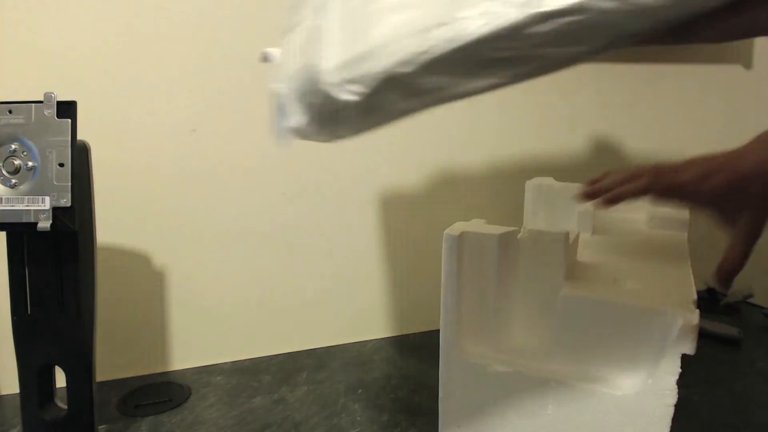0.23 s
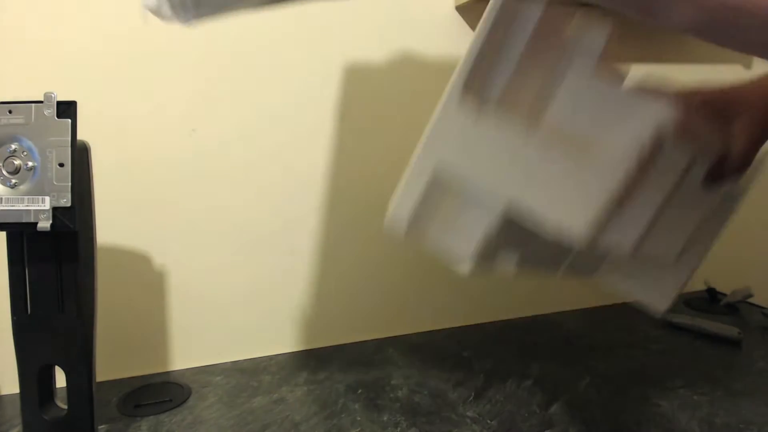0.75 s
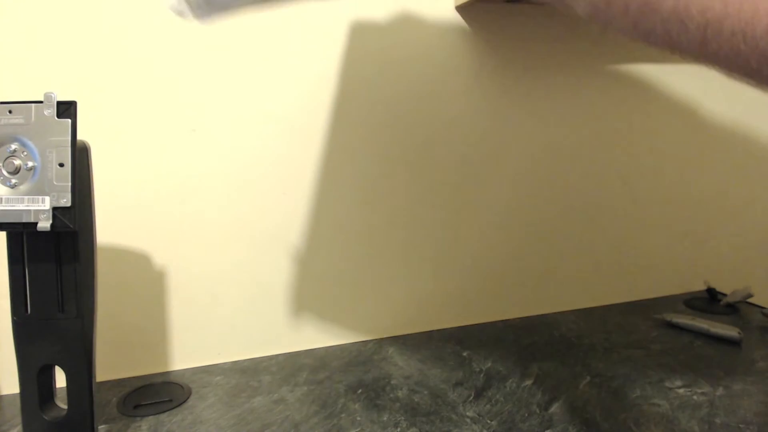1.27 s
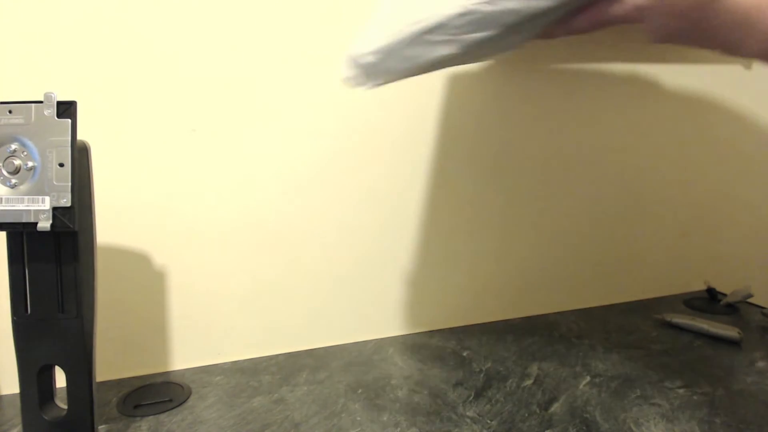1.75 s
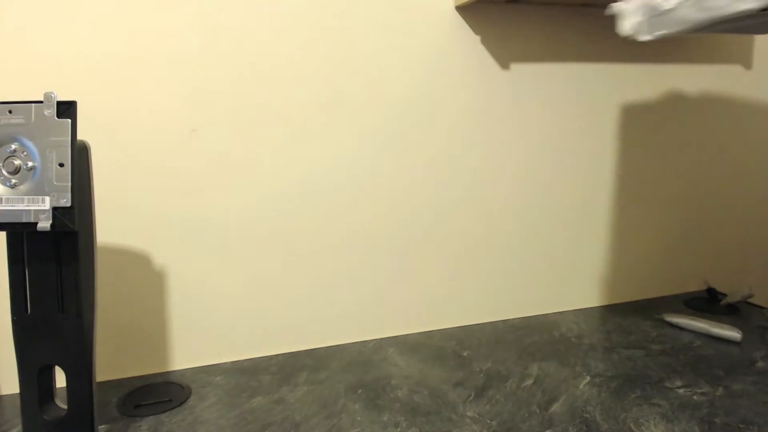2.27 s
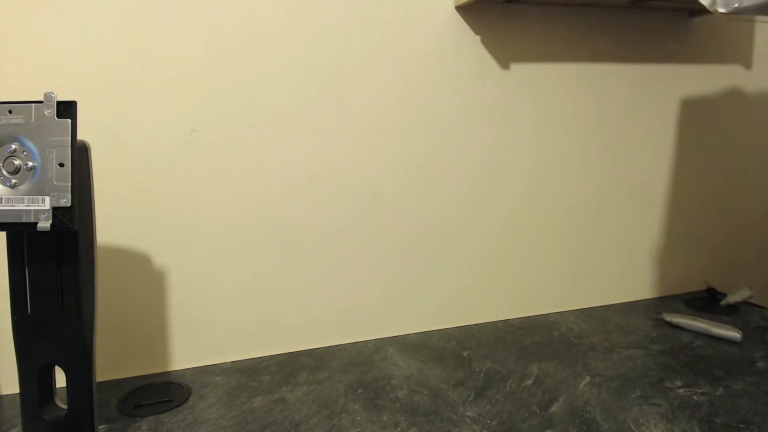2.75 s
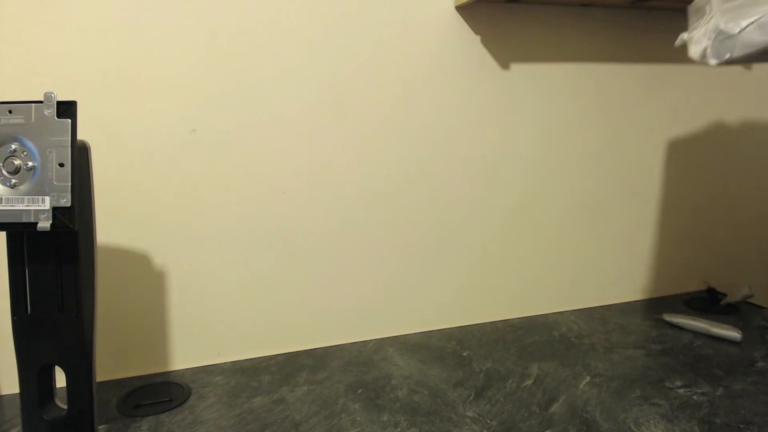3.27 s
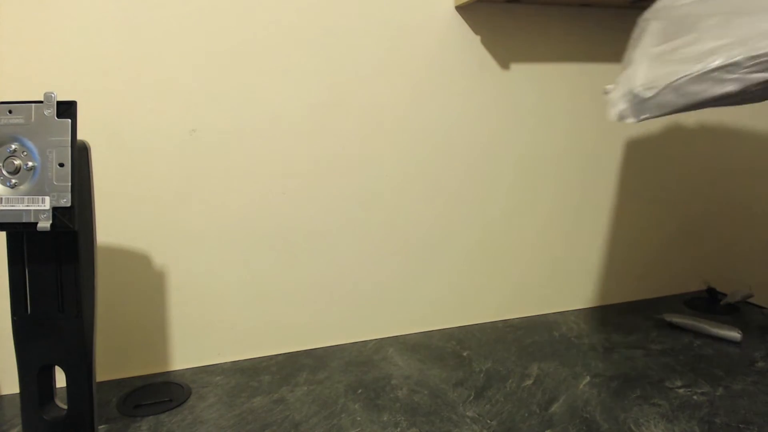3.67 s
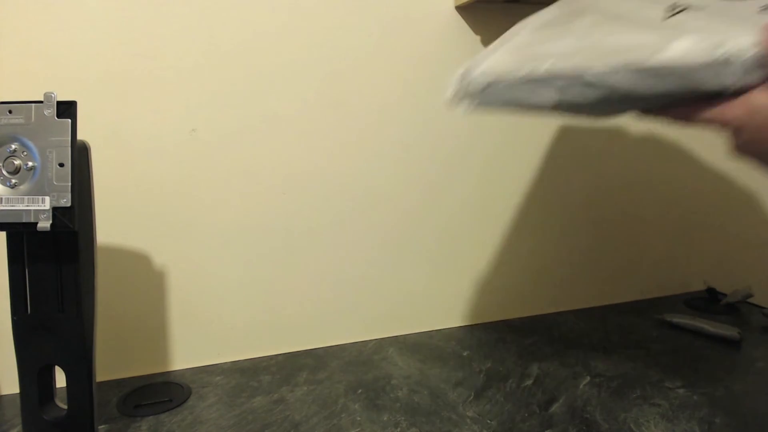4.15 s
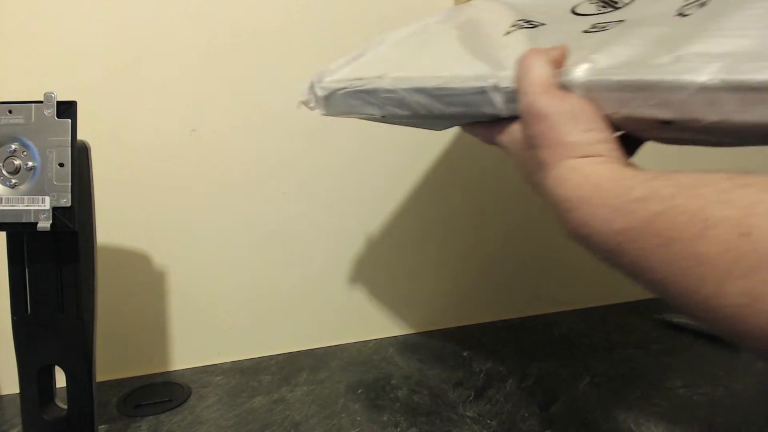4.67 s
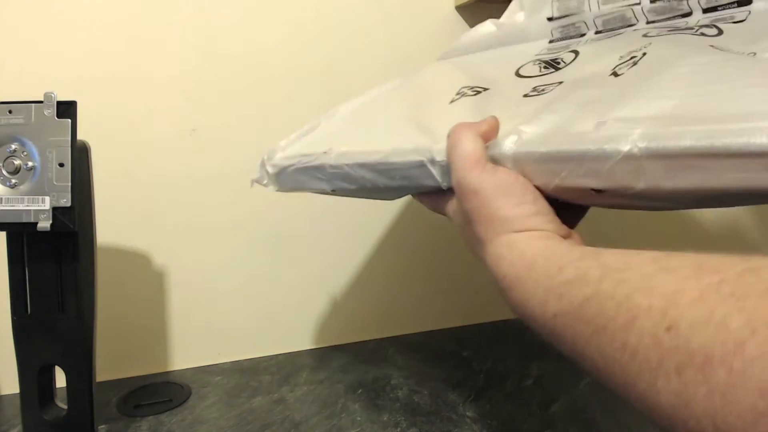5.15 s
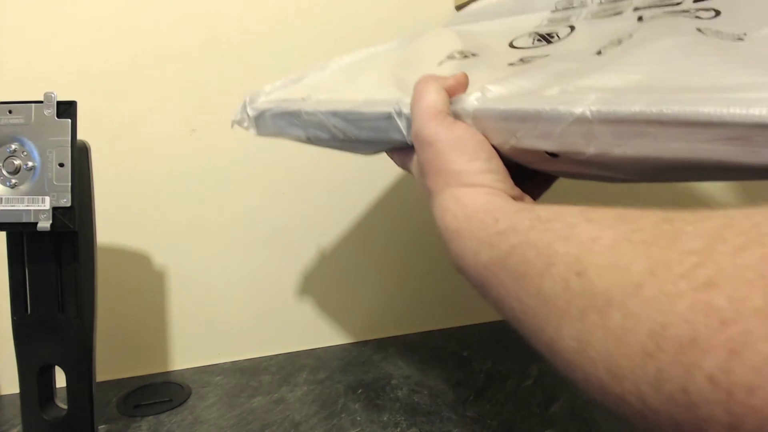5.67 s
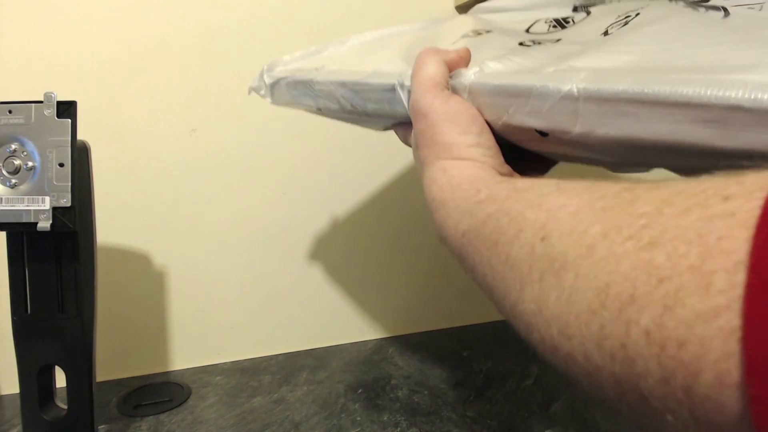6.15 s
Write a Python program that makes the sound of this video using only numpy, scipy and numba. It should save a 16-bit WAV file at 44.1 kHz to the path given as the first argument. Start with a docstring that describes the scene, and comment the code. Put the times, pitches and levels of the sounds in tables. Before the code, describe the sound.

Hands pull moulded foam packing from a cardboard box, close to a mono microphone in a small quiet room. Brief scrapes and a dull knock lead to brisk, bright rubbing strokes, then hollow thumps, the strongest nearly three seconds in. After a near-silent lull, a thin foam sleeve rustles more softly and crinkles, with small snaps and a few low box bumps toward the end.

```python
"""Foam packing pushed into a cardboard box

Hands slide moulded foam blocks and a foam sleeve over each other and into a box, heard close up in mono.
Swarms of tiny bead slips hiss through foam resonances, and a moving resonance makes the foam sheet ring.
Creases snap as short bursts of filtered noise; bumps ring the hollow box as a set of fading tones.
Squeezes shake the hollow block and the box walls; a small room adds echoes and a steady hush."""
import sys
import numpy as np
from scipy import signal
from scipy.fft import rfft, irfft
from scipy.io import wavfile
from scipy.ndimage import uniform_filter1d
from numba import njit

SR = 44100
rng = np.random.default_rng(int(sys.argv[2]) if len(sys.argv) > 2 else 0)


def pcm_store(signal):
    """Save signal as 16-bit PCM."""
    levels = np.round(np.clip(np.atleast_2d(signal), -1, 1) * 32767)
    wavfile.write(sys.argv[1], SR, levels.astype(np.int16).T)


N = 283122  # samples, about 6.4 s

# All levels in the tables are relative: the functions below set the final balance.
# Creases that snap: start_s, level_db, centre_hz, t60_s (time to fade by 60 dB), side_bands_db (re centre)
CREASE_SNAPS = [(0.2038, -44.5, 2080, 0.19, -17), (0.3909, -30.5, 2190, 0.12, -21),
                (0.5032, -35.5, 2400, 0.48, 10), (0.7326, -44, 10400, 0.071, -6),
                (1.1297, -27.5, 1470, 0.25, 1), (1.667, -20.5, 2280, 0.073, -27),
                (1.9798, -40, 7100, 0.14, -20), (2.1549, -34.5, 1500, 0.39, -20),
                (2.7451, -25.5, 8600, 0.31, 12.5), (3.0848, -31, 1560, 0.1, -3),
                (3.6271, -48, 9500, 0.09, 1), (3.715, -33, 2130, 0.079, -14), (3.7882, -32.5, 2350, 0.1, 4),
                (3.852, -36.5, 2470, 0.18, 8), (3.89, -33.5, 2280, 0.39, 10), (3.9894, -31, 2390, 0.19, -2),
                (4.1459, -33.5, 1890, 0.19, 7.5), (4.4994, -31, 2070, 0.091, -21),
                (4.765, -33.5, 2030, 0.22, -10), (4.8213, -26, 5640, 0.079, -18),
                (4.8544, -45, 2260, 0.12, -10), (4.9281, -25, 3280, 0.11, -7.5),
                (5.0803, -28, 1620, 0.16, -26), (5.1177, -29, 2180, 0.077, 2),
                (5.3272, -35, 1690, 0.16, -19), (5.5716, -34.5, 1777, 0.22, -7),
                (5.7363, -29, 1960, 0.11, -22), (5.7921, -26, 1910, 0.097, -27),
                (5.8711, -35, 1420, 0.45, -19), (5.9463, -26.5, 2000, 0.12, -36),
                (6.0451, -25.5, 2650, 0.22, -1.5)]
# Bumps on the box: start_s, level_db, upper_modes_db (re lowest), favoured_hz (upper mode rung most),
# held_s (seconds before the boom fades faster)
BOX_BUMPS = [(0., -35.5, -40, 197.5, 0.049), (0.394, -30, -4, 280, 0.085), (0.477, -13.5, -27, 268, 0.045),
             (1.131, -43, -3, 530, 0.12), (1.665, -18.5, 9, 233, 0.064), (2.157, -37, -16, 453, 0.1),
             (2.178, -11, -23.5, 350, 0.06), (2.566, -32, 4, 468, 0.077), (2.665, -35, 1, 380, 0.1),
             (2.787, -3.5, -23, 254, 0.077), (5.088, -26.5, -4, 452, 0.094),
             (5.177, -15.5, -17.5, 216, 0.064), (5.391, -18, -2, 234, 0.081), (5.42, -18, -34, 234, 0.037),
             (5.866, -31, 3, 568, 0.1), (6.027, -18.5, -12, 199, 0.093)]
# Ringing modes of the hollow box: pitch_hz, level_db, t60_s (when bumped; rubbed walls fade sooner)
BOX_MODES = [(87.3, -19, 0.09), (139.4, -6.5, 0.84), (202.3, 0, 0.135), (216, 10.5, 0.14), (255.8, 7, 0.23),
             (335.2, 4.5, 0.64), (386, 11, 0.18), (510, -9, 0.22), (590, -28, .15)]
# Hiss colour of the foam beads: pitch_hz, level_db
BEAD_COLOUR = [(2800, -2.5), (3300, 0.5), (4500, 0.5), (6200, -1), (7000, -8)]
# Hiss colour of the finest beads: pitch_hz, level_db
FINE_COLOUR = [(7000, -3.5), (7900, -2.5), (9500, -5.5), (11500, -7.5), (13500, -18.5), (15500, -25)]
# Colour of the foam sleeve: pitch_hz, level_db
SLEEVE_COLOUR = [(1100, 5), (1500, 5), (2100, 2.5), (2800, 1)]
# Colour of the hollow inside the block: pitch_hz, level_db
HOLLOW_COLOUR = [(330, 0), (500, -7.5), (800, 4), (1100, -11.5)]
# Spectrum shape of the room hush: pitch_hz, level_db (per Hz)
AIR_SPECTRUM = [(24, -52.5), (40, -58), (139, 0), (333, -1), (377, 6), (817, -5), (1020, -12.5),
                (2920, -11), (5720, -19.5), (14000, -29), (15500, -58)]
# Strokes of foam over foam: start_s, rise_s, hold_s, bead_hiss_db, fine_beads_db (re hiss),
# sheet_ring_db (re hiss)
FOAM_STROKES = [(0.384, 0.016, 0.055, -49.5, 2.5, 0), (0.487, 0.039, 0.046, -47.5, 0.5, 2.5),
                (0.604, 0.037, 0.032, -49.5, -0.5, -4), (1.116, 0.015, 0.0035, -34.5, -1, -9),
                (1.228, 0.027, .025, -33.5, 0.5, -5.5), (1.358, 0.054, 0.0071, -36.5, 0, -2.5),
                (1.484, 0.04, 0.01, -42.5, 1, -2.5), (1.55, 0.024, 0.0074, -50, 0, 1),
                (1.659, 0.012, 0.028, -38, -4, 6.5), (1.693, 0.036, 0.012, -44.5, 9, 2),
                (1.96, 0.026, 0.12, -66.5, -7, 4.5), (2.152, .01, 0.069, -48.5, -13.5, -26),
                (2.309, 0.042, 0.044, -37, -3.5, -1), (2.531, 0.046, 0.071, -49.5, 2, 4),
                (2.617, 0.037, 0.065, -52.5, 3, 8.5), (2.723, 0.04, 0.015, -34, -0.5, -12),
                (2.768, 0.039, 0.13, -47.5, -0.5, -0.5), (2.989, 0.041, .01, -60, 2, 7.5),
                (3.052, 0.03, .005, -51.5, -20, 1), (3.67, 0.15, 0.016, -59.5, -1.5, 0),
                (3.832, 0.056, 0.046, -49.5, 0, -4), (3.897, 0.077, 0.053, -39.5, 0.5, -5.5),
                (4.093, 0.067, 0.05, -53, 1.5, -7), (4.193, 0.053, 0.066, -54.5, 0.5, -2),
                (4.419, 0.041, 0.022, -44, -3.5, -6), (4.563, 0.072, 0.021, -54, -1.5, -6),
                (4.681, 0.023, 0.0057, -57, -12, 1), (4.755, 0.028, .04, -51.5, -14, -7),
                (4.816, 0.035, .005, -44, -8, -6.5), (4.877, .05, 0.056, -57, 0, 9),
                (4.961, 0.051, .005, -46, -2.5, -13), (5.084, 0.031, 0.018, -46, -11, -1),
                (5.122, 0.042, 0.051, -39.5, 2, 1), (5.311, 0.017, 0.018, -57, -2, 5),
                (5.343, 0.042, 0.026, -34, -3, 1.5), (5.41, 0.04, 0.032, -43.5, -3.5, -5),
                (5.548, 0.12, .01, -54, -7.5, 7.5), (5.699, 0.052, 0.0035, -48.5, -11, 0),
                (5.782, 0.023, 0.064, -61.5, -17, 5), (5.882, 0.056, 0.09, -60, -27, 2.5),
                (6.018, 0.028, 0.0039, -44, 0.5, 2), (6.065, 0.043, 0.098, -63.5, -13, 8),
                (6.35, 0.11, .01, -55, -5, -9)]
# Squeezes of the hollow bodies: start_s, rise_s, hold_s, block_hollow_db, resonance_hz,
# box_walls_db (re hollow)
HOLLOW_SQUEEZES = [(0.202, 0.0046, 0.0062, -45.5, 784, -22), (0.377, 0.023, .005, -36.5, 388, 0.5),
                   (0.455, 0.05, 0.0041, -51, 358, 23.5), (0.526, 0.027, .005, -46, 616, -1),
                   (0.64, 0.049, .01, -44.5, 750, -19), (.73, .03, 0.027, -66, 806, -13),
                   (0.89, 0.028, 0.024, -61, 480, -11), (1.117, 0.025, 0.0073, -31.5, 460, -10),
                   (1.231, 0.018, 0.036, -35.5, 426, -25), (1.383, 0.026, 0.019, -39.5, 573, -25),
                   (1.661, 0.019, 0.061, -34.5, 602, -8), (2.002, 0.11, .005, -48.5, 590, -19),
                   (2.153, 0.018, 0.0075, -33, 414, -2.5), (2.18, 0.031, 0.13, -40, 440, -4),
                   (2.367, 0.049, 0.014, -36.5, 447, -25), (2.572, 0.007, 0.0096, -33.5, 462, -59),
                   (2.645, 0.036, 0.0058, -37.5, 440, -15), (2.714, 0.08, 0.0069, -32, 366, 7.5),
                   (2.789, 0.058, 0.028, -44, 385, 3.5), (2.96, 0.052, 0.071, -56, 383, -11),
                   (3.704, 0.0095, 0.014, -52, 690, -8), (3.819, 0.077, .03, -46.5, 430, -12),
                   (3.96, 0.065, 0.0072, -40.5, 544, -16), (4.12, 0.064, .005, -53, 880, -6),
                   (4.228, 0.047, .03, -59, 750, 5), (4.434, .03, .02, -55.5, 443, 8.5),
                   (4.477, 0.015, 0.0046, -46, 504, -10), (4.68, 0.027, 0.0079, -72, 595, 9),
                   (4.943, 0.018, 0.0069, -48, 770, -3), (5.074, 0.015, 0.077, -42, 410, -0.5),
                   (5.152, 0.074, .005, -41.5, 463, 6.5), (5.296, 0.091, 0.021, -40, 507, 6.5),
                   (5.422, 0.04, 0.0045, -37.5, 385, -8), (5.552, 0.027, 0.0057, -59, 600, -5),
                   (5.614, 0.047, 0.0057, -46.5, 470, -3), (5.713, 0.042, 0.076, -61, 537, 0),
                   (5.864, 0.0071, 0.009, -43.5, 610, -19), (5.905, 0.0093, 0.023, -44.5, 560, -19),
                   (6.016, 0.047, 0.012, -55.5, 497, 13), (6.316, .02, 0.027, -68, 513, -7)]
# Faint rustle of the held packing between strokes: time_s, bead_hiss_db, fine_beads_db,
# block_hollow_db, box_walls_db
HELD_RUSTLE = [(0., -61, -66, -60.5, -58.5), (.15, -69.5, -81, -88, -63.5), (.36, -73.5, -85, -89, -63),
               (.75, -66, -78, -69, -64), (.93, -63.5, -73.5, -63.5, -66), (1.1, -61.5, -66, -62, -65),
               (1.63, -72, -98, -54, -58), (1.85, -63.5, -70, -62.5, -61.5), (2.5, -64, -87, -66, -56.5),
               (3.15, -68, -75, -62.5, -67), (3.3, -73, -82, -72, -69), (3.62, -79, -86, -97, -73),
               (3.9, -59, -69, -73, -56.5), (4.4, -58.5, -62.5, -68.5, -62), (4.8, -59.5, -65.5, -62, -54),
               (5.55, -59.5, -70, -60, -59), (6.1, -60.5, -63, -59, -53.5),
               (6.42, -63, -69.5, -64.5, -59.5)]

AIR_DB = -66.5
ROOM_T60_S, ROOM_DB = 0.19, -12.5
TOP_HZ = 15700
SLEEVE_HZ, TAUT_S = 2050, (3.7, 5.07)  # the sleeve rings here while it is pulled taut (from, to)
RISE_POWER = 1.86  # strength grows as this power of time
STROKE_FALL_DB_PER_S, SQUEEZE_FALL_DB_PER_S = 324.5, 348
# sheet ring at -45 dB hiss; it climbs as the stroke presses harder
SHEET_HZ, SHEET_HZ_PER_DB, SHEET_WANDER_HZ = 1980, 7.5, 150
STEP = 44  # samples between points of a gesture's gain curve
WALL_FUNDAMENTAL_DB, CRINKLE_TILT_DB_PER_OCTAVE = 1.5, -2
RUSTLE_SHEET_DB, RUSTLE_HZ = -0.5, 540
# the soft sleeve has a duller top than the blocks
SLEEVE_FROM_S, TOP_BAND_HZ, BLOCK_TOP_DB, SLEEVE_TOP_DB = 2.97, 13500, 5, -3.5


def undb(db):
    """Turn decibels into a gain."""
    return 10 ** (np.asarray(db) / 20)


def unit(x):
    """Scale a signal to an average (RMS) strength of 1."""
    return x / np.sqrt(np.mean(x ** 2))


def band(x, hz, width, order=1):
    """Keep a band of pitches of this width (Hz) around a centre."""
    edges = np.clip([hz - width / 2, hz + width / 2], 20, SR / 2.2)
    return signal.sosfilt(signal.butter(order, edges, "bandpass", fs=SR, output="sos"), x)


@njit
def moving_band(x, hz, sharp):
    """Band-pass whose centre moves; width = centre / sharp."""
    y, b, l = np.empty(len(x)), 0., 0.  # b and l: the filter's band and low memories
    for i in range(len(x)):
        g = np.tan(np.pi * hz[i] / SR)
        v = (b + g * (x[i] - l)) / (1 + g * (g + 1 / sharp))
        b, l, y[i] = 2 * v - b, l + 2 * g * v, v
    return y


def ring(x, hz, t60):
    """One mode: a tone that x sets ringing and that then dies away."""
    pole = np.exp(2j * np.pi * hz / SR - np.log(1000) / (t60 * SR))
    return signal.lfilter([1], [1, -pole], x).imag


def walk(rate):
    """Random levels 1 / rate s apart, joined smoothly."""
    gap = int(SR / rate)
    levels = rng.standard_normal(N // gap + 2)
    steps = np.interp(np.arange(N) / gap, np.arange(N // gap + 2), levels)
    return 1.2 * uniform_filter1d(steps, gap // 2)


def slips(scatter_db):
    """A swarm of tiny slips: most are faint, a few stand out."""
    boost_db = scatter_db * np.minimum(rng.exponential(size=N), 5.)
    return rng.standard_normal(N) * undb(boost_db)


def resonant(hz, sharp):
    """Slips through one strong resonance that shifts with the grip."""
    once = moving_band(slips(3.3), hz, sharp)
    return unit(moving_band(once, hz, sharp))


def rub(colour, patchy_db, scatter_db=3.0, count=8):
    """Slips ring a row of foam resonances, each coming and going as the contact patch wanders."""
    hz, db = np.transpose(colour)
    width = (hz[-1] - hz[0]) / count
    out = 0
    swarms = slips(scatter_db), slips(scatter_db)
    for k, f in enumerate(np.linspace(hz[0], hz[-1], count)):
        level_db = np.interp(np.log(f), np.log(hz), db) + patchy_db * walk(22)
        out = out + undb(level_db) * band(swarms[k % 2], f, width, order=2)
    return unit(out)


def curves(rows):
    """Join each column's points by straight lines over time."""
    s, *columns = np.transpose(rows)
    return [np.interp(np.arange(N) / SR, s, c) for c in columns]


def gestures(rows, fall_db_per_s):
    """One gain row per gesture: a rise, a hold, then a steady fall in dB."""
    t = np.arange(0, N + STEP, STEP) / SR
    start, rise, hold, db = (c[:, None] for c in np.transpose(rows)[:4])
    up = np.clip((t - start) / np.maximum(rise, .002), 0, 1) ** RISE_POWER
    falling_s = np.maximum(t - start - rise - np.maximum(hold, 0), 0)
    return up * undb(db - fall_db_per_s * falling_s)


def joined(gains, weights):
    """Weighted sum of the gesture rows, at full rate."""
    total = np.asarray(weights) @ gains
    return np.interp(np.arange(N) / STEP, np.arange(len(total)), total)


def bumps():
    """A soft push and a short rattle ring the box modes until the boom is faded out quickly."""
    out, t = np.zeros(N + SR), np.arange(SR // 2) / SR
    push = np.sin(np.pi * np.clip(t / 0.00069, 0, 1)) ** 2
    for s, db, upper_db, best_hz, held_s in BOX_BUMPS:
        rattle = 0.63 * rng.standard_normal(len(t)) * np.exp(-t / 0.013)
        drive = push + rattle
        place_db = 1.03 * rng.standard_normal(len(BOX_MODES))  # every spot couples to the modes differently
        boom = 0
        for (hz, mode_db, t60), spot_db in zip(BOX_MODES, place_db):
            # upper modes lose 10.2 dB for each octave away from the favoured pitch
            favour_db = (upper_db + 5.0 - 10.2 * abs(np.log2(hz / best_hz))) * (hz > 160)
            boom = boom + undb(mode_db + spot_db + favour_db) * ring(drive, hz, t60)
        boom *= np.exp(-np.maximum(t - held_s, 0) / .027)  # the boom fades quickly after held_s
        out[int(s * SR):][:len(t)] += undb(db - 14.5) * boom / np.max(np.abs(boom))
    return out[:N]


def crinkles():
    """Lone ticks of film and beads, each ringing briefly in one of many narrow foam resonances."""
    out = 0
    for hz in np.geomspace(1300, 9000, num=18):
        strength = undb(0.93 * np.minimum(rng.exponential(size=N), 3.))
        ticks = (rng.random(N) < 16 / SR) * strength  # about 16 a second
        puff = signal.lfilter([1], [1, -np.exp(-1 / (.008 * SR))], ticks)  # each fades over 8 ms
        tick = unit(band(puff * rng.standard_normal(N), hz, 120 + .06 * hz, order=2))
        out = out + undb(CRINKLE_TILT_DB_PER_OCTAVE * np.log2(hz / 1300)) * tick
    return unit(out)


def sliding():
    """Beads hiss and the sheet rings as the hand moves; the surfaces catch and let go."""
    gains = gestures(FOAM_STROKES, STROKE_FALL_DB_PER_S)
    rustle, rustle_fine = undb(curves(HELD_RUSTLE)[:2])
    fine_db, sheet_db = np.transpose(FOAM_STROKES)[4:]
    hiss = joined(gains, np.ones(len(gains))) + rustle
    fine = joined(gains, undb(fine_db)) + rustle_fine
    sheet = joined(gains, undb(sheet_db)) + undb(RUSTLE_SHEET_DB) * rustle
    pressing_db = 20 * np.log10(hiss) + 45
    sheet_hz = SHEET_HZ + SHEET_HZ_PER_DB * pressing_db + SHEET_WANDER_HZ * walk(12)
    t = np.arange(N) / SR
    taut = (t > TAUT_S[0]) * (t < TAUT_S[1]) * undb(1.9 * walk(16))
    sleeve = unit(band(slips(3.), SLEEVE_HZ, 260, order=2))
    ring_sheet = 0.5 * resonant(sheet_hz, 2.6) + 0.9 * rub(SLEEVE_COLOUR, 2.2, count=5)
    ring_sheet = ring_sheet + .8 * taut * sleeve
    beads = rub(BEAD_COLOUR, 1.93, count=8) + undb(-1.5) * crinkles()
    grit = rub(FINE_COLOUR, 2.4, count=10)
    catching = undb(1.43 * walk(45))
    return catching * (hiss * beads + fine * grit + sheet * ring_sheet)


def bodies():
    """Rubbing shakes the hollow of the block and the walls of the box."""
    gains = gestures(HOLLOW_SQUEEZES, SQUEEZE_FALL_DB_PER_S)
    rustle, rustle_walls = undb(curves(HELD_RUSTLE)[2:])
    squeeze_hz, walls_db = np.transpose(HOLLOW_SQUEEZES)[4:]
    hollow = joined(gains, np.ones(len(gains))) + rustle
    # a weighted average, so the strongest squeeze counts most
    hollow_hz = (joined(gains, squeeze_hz) + RUSTLE_HZ * rustle) / hollow
    block = 0.61 * resonant(hollow_hz, 2.62) + 0.47 * rub(HOLLOW_COLOUR, 4.6, count=4)
    shake = rng.standard_normal(N) * (joined(gains, undb(walls_db)) + rustle_walls)
    walls = 0
    for hz, db, t60 in BOX_MODES[1:5]:
        mode_db = db + WALL_FUNDAMENTAL_DB * (hz < 160)
        walls = walls + undb(mode_db) * ring(shake, hz, 0.37 * t60)
    return hollow * block + undb(-40.5) * walls


def air():
    """Steady room hush: noise shaped by a spectrum, wavering a little."""
    hz, db = np.transpose(AIR_SPECTRUM)
    f = np.arange(N // 2 + 1) * SR / N + 1  # 1 Hz up, so the log is safe at zero
    shape = undb(np.interp(np.log(f), np.log(hz), db))
    hush = irfft(rfft(rng.standard_normal(N)) * shape, N)
    return undb(AIR_DB + 0.11 * walk(7.04)) * unit(hush)


def snaps():
    """Each crease cracks, then crackles away in a main band, a few chance bands and a broad hiss."""
    out, t = np.zeros(N + SR), np.arange(SR // 4) / SR
    for s, db, hz, t60, bright_db in CREASE_SNAPS:
        noise = rng.standard_normal((2, len(t)))
        sides = sum(unit(band(noise[1], f, 500)) for f in rng.uniform(1200, 11400, size=4))
        wide = unit(sides) + 0.84 * unit(band(noise[0], 4920, 8200, order=2))
        main = unit(band(noise[0], hz, 0.27 * hz, order=2))
        crackle = main + undb(bright_db) * unit(wide)
        crack = 0.66 * np.exp(-t / 0.0013)
        fade = np.exp(-np.log(1000) * t / max(t60, .01)) + crack
        out[int(s * SR):][:len(t)] += undb(db - 16.0) * crackle * fade
    return out[:N]


def room(x):
    """Dense early echoes of desk and walls, the treble dying first."""
    t = np.arange(SR // 2) / SR
    fade = -np.log(1000) * t / ROOM_T60_S
    noise = rng.standard_normal(len(t))
    dull = band(noise, 1500, 3600)
    tail = dull * np.exp(fade) + (noise - dull) * np.exp(3.84 * fade)
    tail = tail * (t > .003)  # the first echo comes after 3 ms
    echoes = signal.fftconvolve(x, tail / np.sqrt(np.sum(tail ** 2)))[:N]
    return x + undb(ROOM_DB) * echoes


def scene():
    """Foam and hollow bodies sound in the room; box bumps and hush join without added echoes."""
    t = np.arange(N) / SR
    foam = undb(-4.0) * sliding() + snaps()
    top_db = np.where(t < SLEEVE_FROM_S, BLOCK_TOP_DB, SLEEVE_TOP_DB)
    foam = foam + (undb(top_db) - 1) * band(foam, TOP_BAND_HZ, 4800)
    mono = room(foam + bodies()) + bumps() + air()
    return np.array([mono, mono])


def record(dry):
    """The microphone drops the deep bass; the top is cut steeply."""
    dry = signal.sosfilt(signal.butter(8, 72, "highpass", fs=SR, output="sos"), dry)
    return signal.sosfilt(signal.ellip(14, .2, 80, TOP_HZ, fs=SR, output="sos"), dry)


dry = scene()
out = record(dry)
pcm_store(out)
```